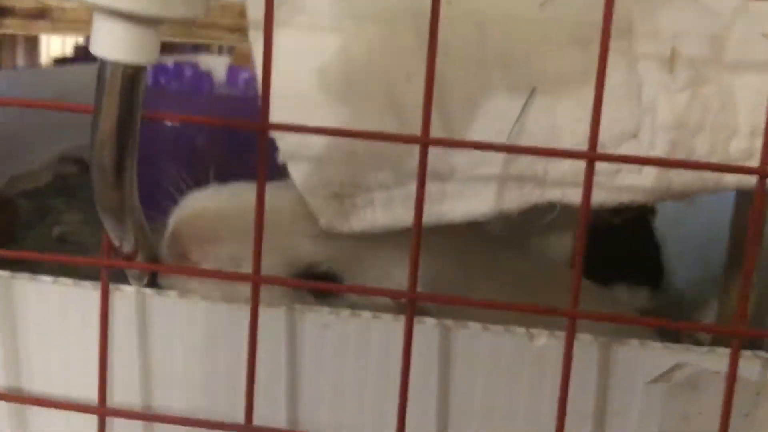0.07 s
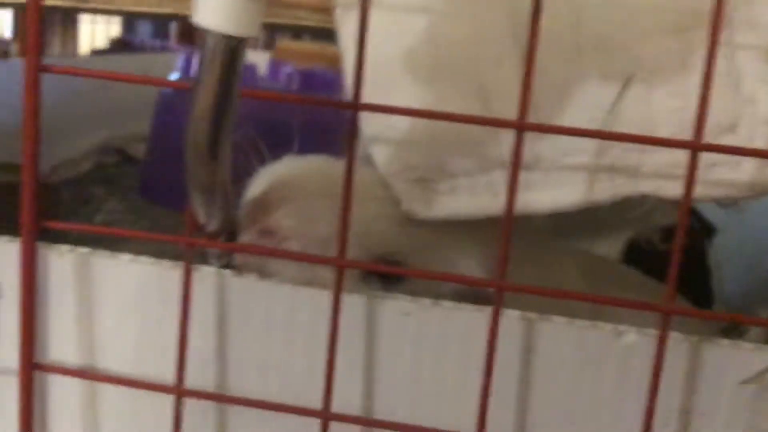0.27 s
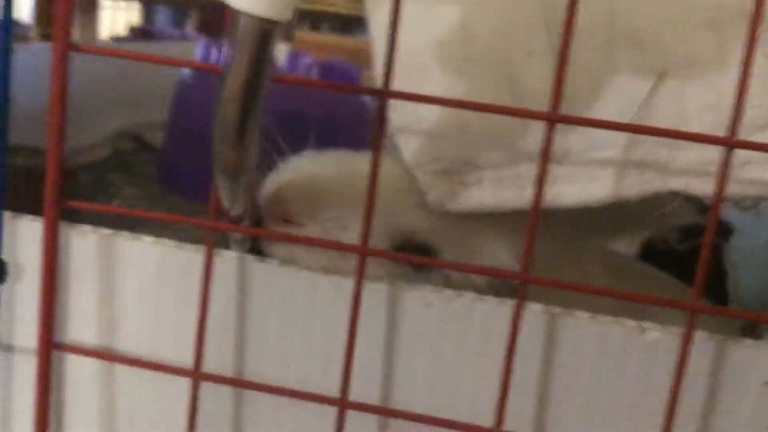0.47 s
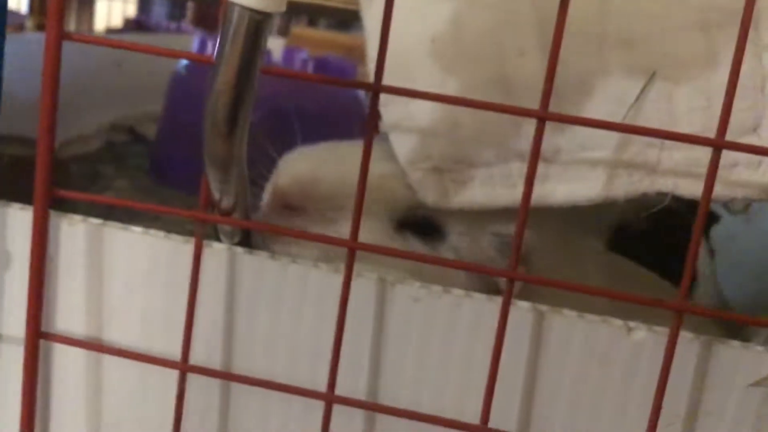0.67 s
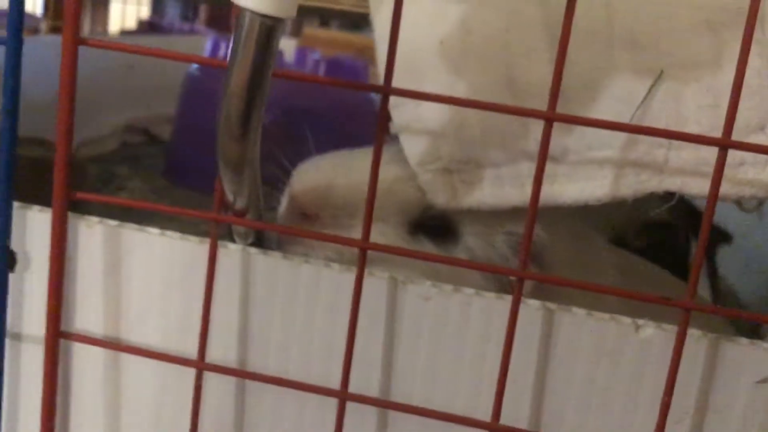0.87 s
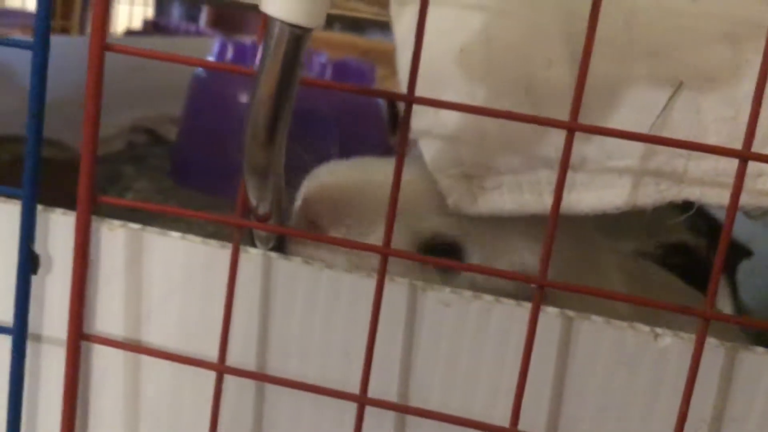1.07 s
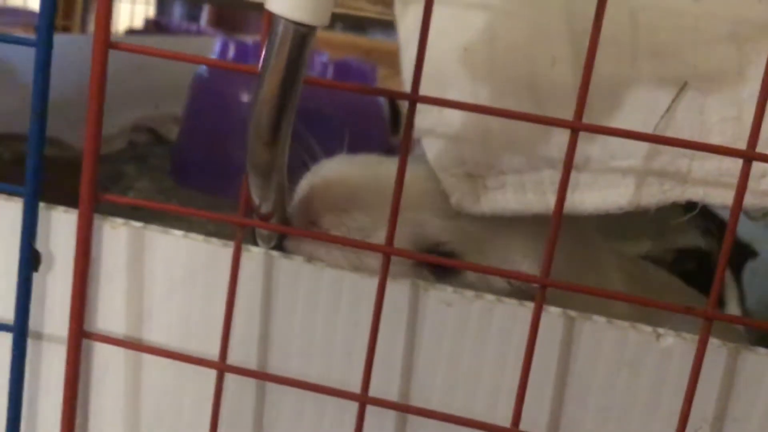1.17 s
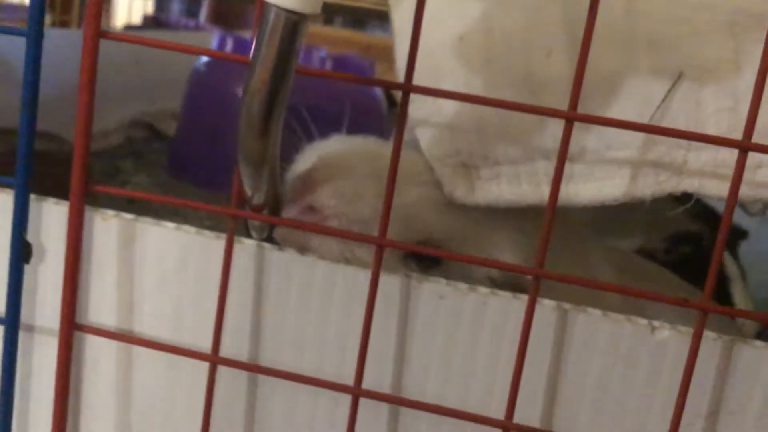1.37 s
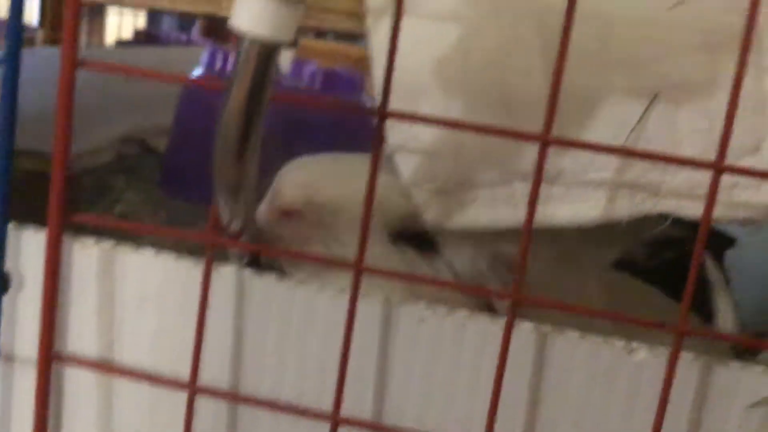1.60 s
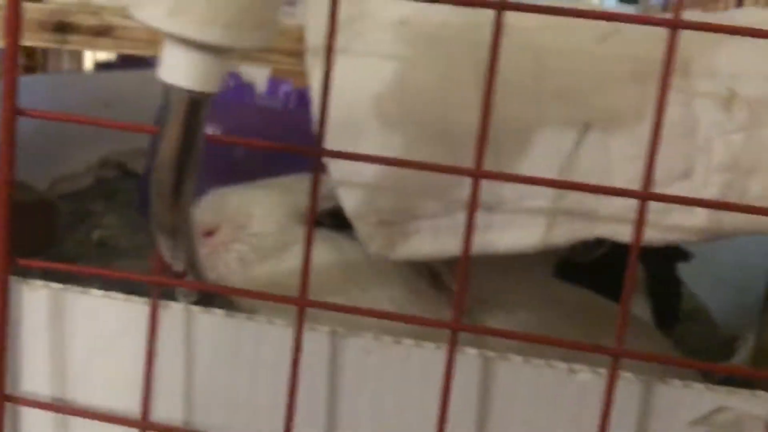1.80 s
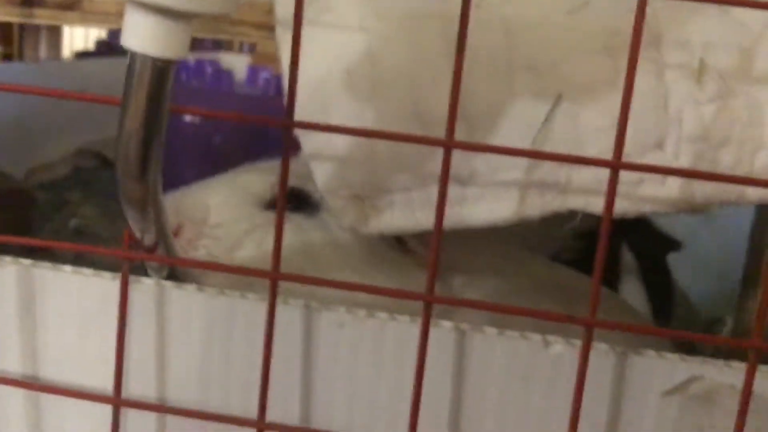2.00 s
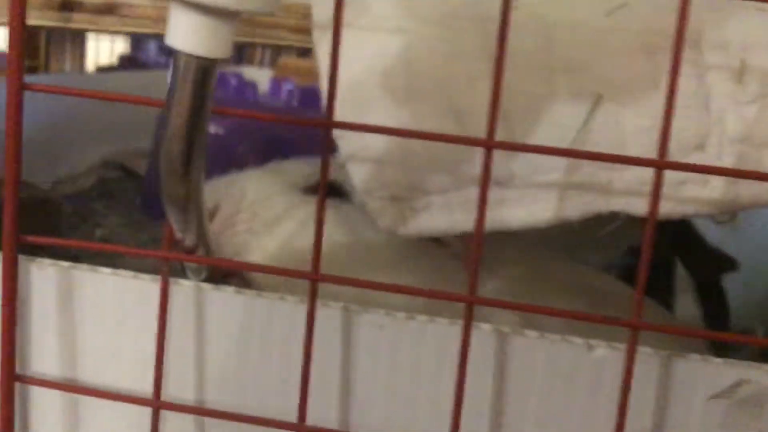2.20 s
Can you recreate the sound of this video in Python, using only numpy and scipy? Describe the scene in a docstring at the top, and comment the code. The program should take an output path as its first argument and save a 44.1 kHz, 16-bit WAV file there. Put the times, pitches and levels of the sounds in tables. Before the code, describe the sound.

Handling noise dominates early: light rubbing from the start, then heavy muffled thumps, scraping and small creaks at 0.2-0.47 seconds, with faint spout snicks and cage wires ringing briefly. A soft hiss fades after about 0.25. Tiny wet ticks from a guinea pig's mouth cluster at 0.5-0.75, then come singly near 0.9, 1.3, 1.6, 1.8 and 2.0-2.2, over quiet low rumble and hum, close up.

```python
"""A hiss is heard first, then soon dulls and dies; a low rumble, a hum and a faint whine rise and stay.
Meanwhile a hand rubs and bumps the microphone: filtered impulses, shaped noise and ringing cage wires.
A guinea pig works the steel spout of a water bottle in a wire cage, in a quiet room.
The spout snicks a few times: millisecond noise bursts through resonances.
The mouth makes tiny wet ticks: shaped impulses, each smeared into a very short falling chirp."""
import sys
import numpy as np
from scipy import signal
from scipy.fft import rfft, irfft
from scipy.io import wavfile

SR = 44100
rng = np.random.default_rng(int(sys.argv[2]) if len(sys.argv) > 2 else 0)


def persist_wave(psi):
    """Save psi, clipped to +-1, as 16-bit WAV."""
    counts = np.round(np.clip(psi, -1, 1) * 32767).astype(np.int16)
    wavfile.write(sys.argv[1], SR, np.atleast_2d(counts).T)


N = 99225
TIME = np.arange(N) / SR   # seconds

# tone colour of the room rumble: pitch_hz, density_db (dB per Hz, relative)
ROOM_COLOUR = [(25, -26), (40, 2.5), (60, 4.5), (110, -2.5), (170, -13), (280, -17.5), (400, -24),
               (650, -26.5), (1100, -35), (2200, -37), (5000, -40), (7000, -44.5), (9500, -46),
               (13000, -50.5), (15500, -55.5)]
# steady hum and thin whine: pitch_hz, level_db
HUMS = [(59.2, -74), (9001, -103)]
ROOM_DB, ROOM_RISE_S = -63.5, 0.11

# tone colour of the hiss: pitch_hz, density_db (dB per Hz, relative)
HISS_COLOUR = [(100, 10.5), (400, 11.5), (800, 6.5), (1500, -0.5), (3000, -5), (7500, -5), (11000, -10),
               (15000, -9.5)]
HISS_DB, HISS_HOLD_S, HISS_FADE_DB_PER_S = -67.5, 0.25, 235
HISS_EARLIER_S_PER_HZ = 8e-6   # higher pitches start fading sooner
HISS_GRAIN_DB, SCRAPE_GRAIN_DB, GRAINS_PER_S = 1.7, 3.5, 260   # random flutter

# handling bumps: start_s, strength_db, soft_above_hz
BUMPS = [(0.0898, -7, 170), (0.1619, -7, 303), (.2160, 8.5, 259), (.2440, 13, 234), (0.2488, 26, 120),
         (0.3311, -3, 337), (0.335, 15, 79), (.3600, 2.5, 296), (0.4067, 9.5, 330), (0.41, 14.5, 110),
         (0.4396, 4, 330), (0.4629, 19, 320), (2.0590, -1, 84)]
BOOM_HZ, BOOM_WIDTH_HZ, BOOM_DB = 57, 19, -3   # deep ring after each bump
# rubbing of the hand, points on a level curve: time_s, rumble_db, scrape_db
RUB = [(0, -73, -72.5), (.08, -59, -60.5), (.14, -64, -69.5), (.20, -63, -59), (0.222, -43.5, -44),
       (0.244, -39, -40.5), (0.281, -42, -57.5), (.36, -45, -61.5), (.39, -54.5, -65), (.44, -37.5, -57.5),
       (.52, -58, -80), (.70, -58, -78), (.85, -79.5, -83)]
# tone colours of the rubbing: pitch_hz, density_db (dB per Hz, relative)
RUMBLE_COLOUR = [(30, -25.5), (55, 1), (120, -2), (190, -10.5), (400, -34), (1500, -76.5)]
SCRAPE_COLOUR = [(120, -6.5), (280, 6), (600, -8), (1200, -25), (2500, -38), (6000, -48), (15000, -77)]
# cage wires stirred by the handling: pitch_hz, relative_level_db, ring_s (time to fall 60 dB)
CAGE_WIRES = [(563, -35, 0.9), (660, -29.5, 0.083), (718, -25.5, 0.22), (752, -18.5, 0.61),
              (1410, -21, 0.35)]
CAGE_DB = 19.5   # added to every wire
CREAK_START_S, CREAK_END_S = 0.20, 0.41
CREAKS_PER_S, CREAK_DB, CREAK_SOFT_ABOVE_HZ = 160, -22.5, 4500

# metal snicks of the spout: start_s, strength_db, thin_below_hz, bright_up_to_hz
SNICKS = [(.1628, -43, 4500, 15000), (0.2145, -43, 3500, 6100), (0.3174, -66, 900, 2940),
          (.3400, -66, 1200, 3910), (0.4038, -52, 500, 1710), (0.457, -45.5, 1210, 3000),
          (.4610, -50, 600, 8000)]
SNICK_DECAY_S = 0.0011
# resonances of the spout: pitch_hz, width_hz, level_db
SPOUT_RESONANCES = [(1050, 420, 4), (2430, 1060, 0.5), (3860, 1600, -0.5), (8350, 1500, -0.5),
                    (14000, 5900, -8.5)]

# wet ticks at the spout: start_s, strength_db, bright_up_to_hz
TICKS = [(0.359, -11.5, 2990), (0.5008, -6, 2000), (.5400, -17, 6000), (.5490, -9.5, 8000),
         (0.5789, -21, 5000), (0.595, -19, 1500), (0.6162, -12, 6000), (0.6374, -17, 3500),
         (0.6815, -18.5, 3500), (0.7012, -16, 2500), (0.7479, -8, 7500), (.9120, -13.5, 7000),
         (1.3137, -6, 1180), (1.6049, -10, 3500), (1.6534, -21.5, 2500), (1.7825, -20, 5000),
         (1.8268, -3.5, 8500), (2.0181, -13.5, 6000), (2.0471, -18.5, 3500), (2.059, -15, 2000),
         (2.1772, -10, 4200)]
TICK_TOP_HZ = 8500   # all ticks are softened above this
TICK_BODY_HZ, TICK_EDGE_HZ = 204.7, 834   # full below the first, a sharp edge above the second

LAG_HZ, LAG_STAGES, LOW_CUT_HZ = 139.5, 4, 53.2   # lows arrive late, the deepest are lost
CUTOFF_HZ = 15700   # top of the whole sound


def from_db(db):
    """Turns decibels into a gain."""
    return 10 ** (np.asarray(db) / 20)


def cut(x, hz, kind="low", order=2):
    """A smooth (Butterworth) filter that keeps the lows, or the highs if kind is "high"."""
    sections = signal.butter(order, min(hz, .45 * SR), kind, fs=SR, output="sos")
    return signal.sosfilt(sections, x + 1e-18)


def resonate(x, hz, width_hz):
    """A ringing resonance with gain 1 at its peak; a narrower one rings longer."""
    radius = np.exp(-np.pi * width_hz / SR)
    feed = np.array([1, 0, -1]) * (1 - radius ** 2) / 2
    feedback = [1, -2 * radius * np.cos(2 * np.pi * hz / SR), radius ** 2]
    return signal.lfilter(feed, feedback, x + 1e-18)


def noise(colour):
    """Random noise of average (rms) level 1, shaped to the given tone colour."""
    hz, db = np.transpose(colour)
    bins = np.maximum(np.fft.rfftfreq(N, 1 / SR), 1)
    gain = from_db(np.interp(np.log(bins), np.log(hz), db))
    gain = gain * np.minimum(bins / hz[0], 1) ** 2   # fades out below the first pitch
    x = irfft(rfft(rng.standard_normal(N)) * gain, N)
    return x / x.std()


def grain(depth_db):
    """A gain that flutters at random, gliding between random decibel values."""
    knots = rng.standard_normal(N)
    return from_db(depth_db * np.interp(TIME * GRAINS_PER_S, np.arange(N), knots))


def click(start_s, db):
    """One impulse: a single sample, silence elsewhere."""
    return from_db(db) * (np.arange(N) == int(start_s * SR))


def tick_shape(clicks):
    """Gives impulses a round body, plus its slope as a sharp leading edge."""
    body = cut(clicks, TICK_BODY_HZ)
    slope = np.diff(body, prepend=0) * SR
    return body + slope / (2 * np.pi * TICK_EDGE_HZ)


def chirped(x):
    """Allpass stages delay the lows, so an impulse becomes a falling chirp."""
    k = np.tan(np.pi * LAG_HZ / SR)
    a = (k - 1) / (k + 1)
    for _ in range(LAG_STAGES):
        x = signal.lfilter([-a, -1], [1, a], x)
    return cut(x, LOW_CUT_HZ, "high", order=4)


def room():
    """Shaped noise rumbles under a sine hum and whine; all come up quickly and stay."""
    tones = 0
    for hz, db in HUMS:
        wave = np.sin(2 * np.pi * (hz * TIME + rng.random()))
        tones = tones + from_db(db) * np.sqrt(2) * wave   # root 2 makes db the rms level
    rise = np.minimum(TIME / ROOM_RISE_S, 1)
    return (from_db(ROOM_DB) * noise(ROOM_COLOUR) + tones) * rise


def hiss(count=16):
    """Bright noise split into bands holds, then dies away from the top down."""
    spectrum = rfft(noise(HISS_COLOUR))
    bins = np.fft.rfftfreq(N, 1 / SR)
    centres, step = np.linspace(0, CUTOFF_HZ, count, retstep=True)
    out = 0
    for hz in centres:
        # overlapping triangles share the spectrum between the bands
        band = irfft(spectrum * np.maximum(1 - np.abs(bins - hz) / step, 0), N)
        fading_s = np.maximum(TIME - HISS_HOLD_S + HISS_EARLIER_S_PER_HZ * hz, 0)
        out = out + band * from_db(-HISS_FADE_DB_PER_S * fading_s)
    return from_db(HISS_DB) * out * grain(HISS_GRAIN_DB)


def bumping():
    """Muffled impulses, each setting off a deep resonance."""
    bumps = sum(cut(click(s, db), hz, order=5) for s, db, hz in BUMPS)
    return bumps + from_db(BOOM_DB) * resonate(bumps, BOOM_HZ, BOOM_WIDTH_HZ)


def rubbing():
    """Friction as low rumble and fluttering scrape noise; the scrape also rings the cage wires."""
    time_s, rumble_db, scrape_db = np.transpose(RUB)
    rumble = from_db(np.interp(TIME, time_s, rumble_db)) * noise(RUMBLE_COLOUR)
    scrape = from_db(np.interp(TIME, time_s, scrape_db)) * noise(SCRAPE_COLOUR)
    scrape = scrape * grain(SCRAPE_GRAIN_DB)
    wires = 0
    for hz, db, ring_s in CAGE_WIRES:
        width_hz = np.log(1000) / (np.pi * ring_s)
        wires = wires + from_db(CAGE_DB + db) * resonate(scrape, hz, width_hz)
    return rumble + scrape + wires


def creaking():
    """Tiny ticks at random moments as the grip settles."""
    slips = rng.random(N) < CREAKS_PER_S / SR
    slips = slips & (TIME > CREAK_START_S) & (TIME < CREAK_END_S)
    clicks = slips * from_db(CREAK_DB) * rng.uniform(1.0, 1.8, N)
    return tick_shape(cut(clicks, CREAK_SOFT_ABOVE_HZ))


def handling():
    """The hand on the microphone: bumps and creaks with late lows, plus the rubbing."""
    return chirped(bumping() + creaking()) + rubbing()


def spout():
    """Millisecond noise rattles ring the damped steel tube."""
    rattle = 0
    for start_s, db, low_hz, high_hz in SNICKS:
        decay = (TIME >= start_s) * np.exp(-np.abs(TIME - start_s) / SNICK_DECAY_S)
        burst = from_db(db) * decay * rng.standard_normal(N)
        rattle = rattle + cut(cut(burst, high_hz), low_hz, "high", order=1)
    ringing = 0
    for k, (hz, width_hz, db) in enumerate(SPOUT_RESONANCES):
        sign = (-1) ** k   # every other resonance is flipped
        ringing = ringing + sign * from_db(db) * resonate(rattle, hz, width_hz)
    return ringing


def mouth():
    """Single wet ticks: impulses softened by differing amounts, then shaped and chirped."""
    contacts = sum(cut(click(s, db), hz, order=1) for s, db, hz in TICKS)
    return chirped(tick_shape(cut(contacts, TICK_TOP_HZ)))


def scene():
    """Adds all sources at one close microphone."""
    return (room() + hiss() + handling() + spout() + mouth())[None]


def record(dry):
    """A steep (elliptic) filter cuts off the top."""
    return signal.sosfilt(signal.ellip(12, .1, 80, CUTOFF_HZ, fs=SR, output="sos"), dry)


dry = scene()
out = record(dry)
persist_wave(out)
```